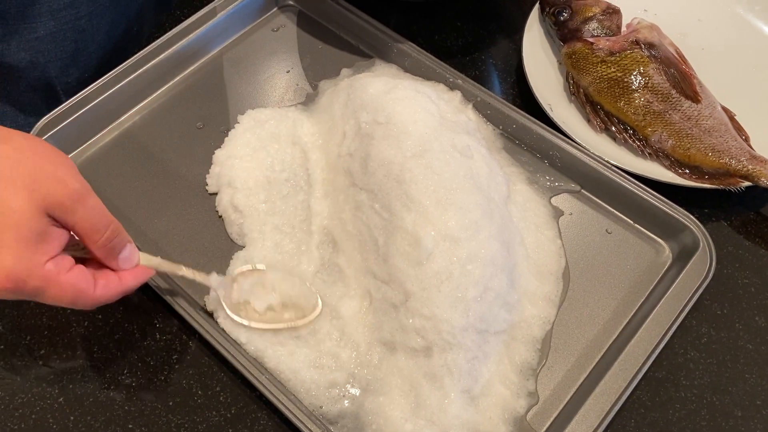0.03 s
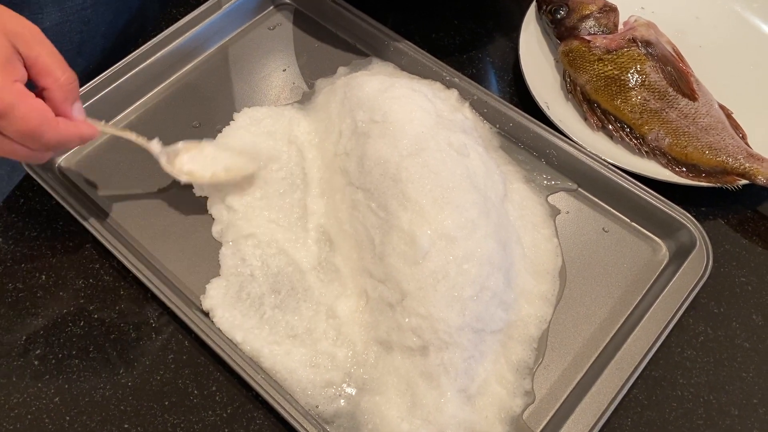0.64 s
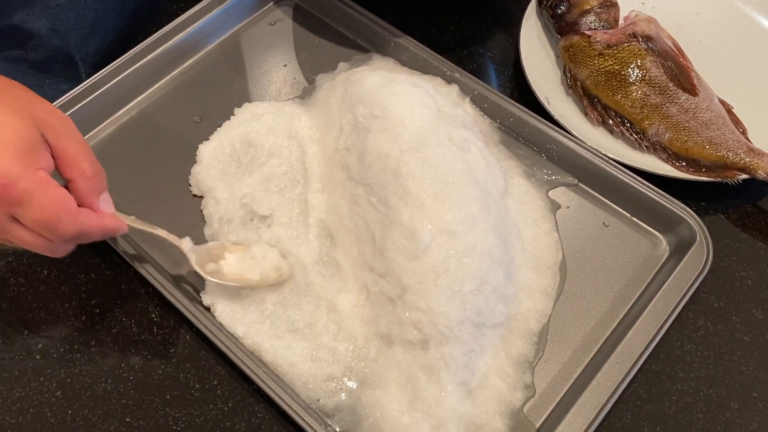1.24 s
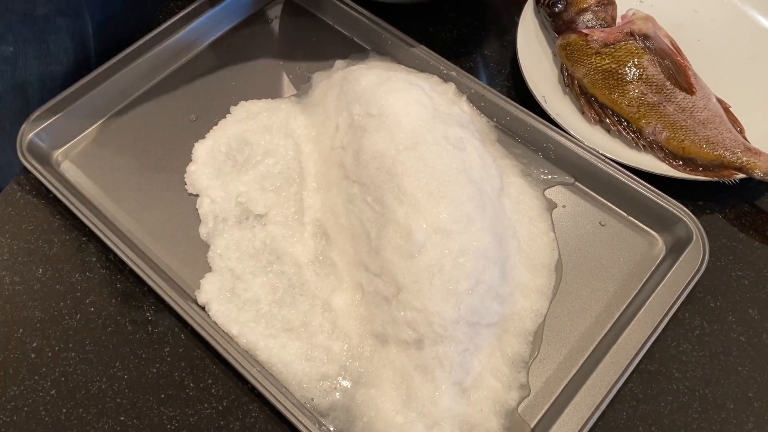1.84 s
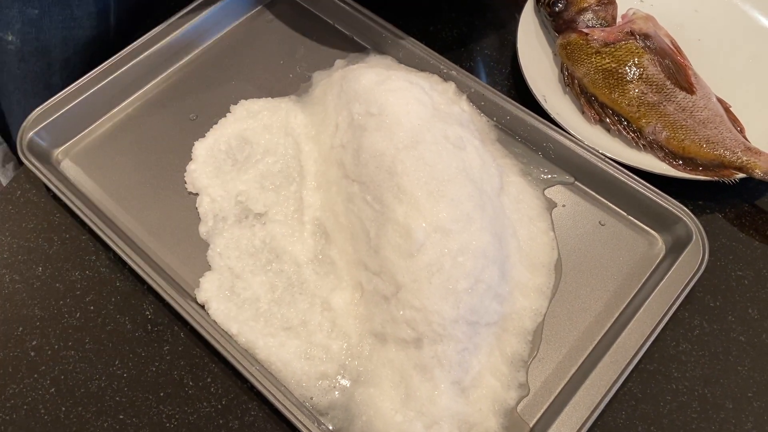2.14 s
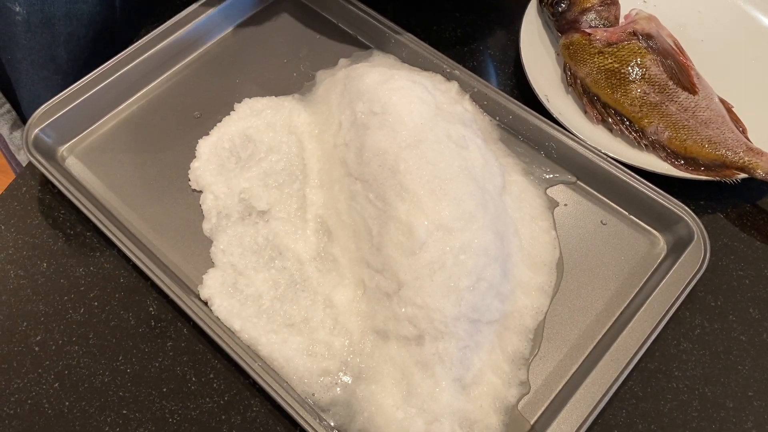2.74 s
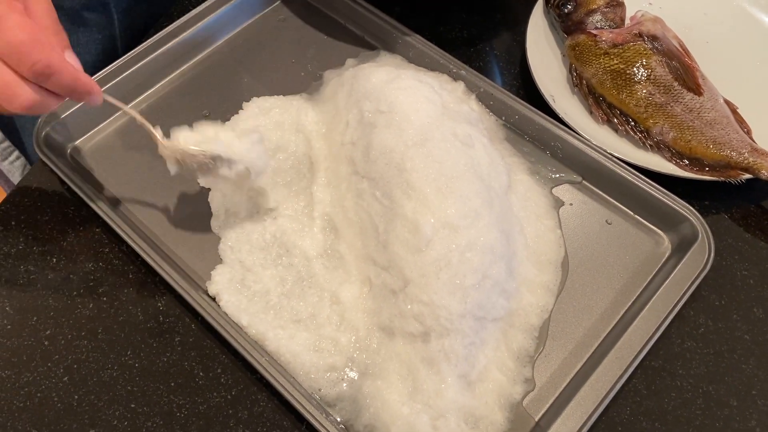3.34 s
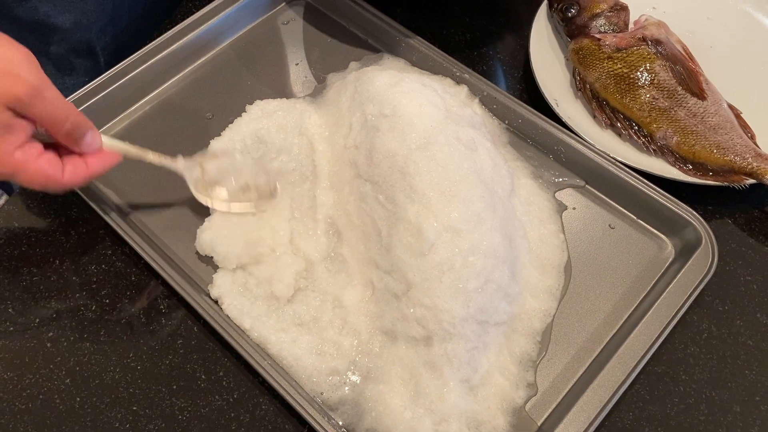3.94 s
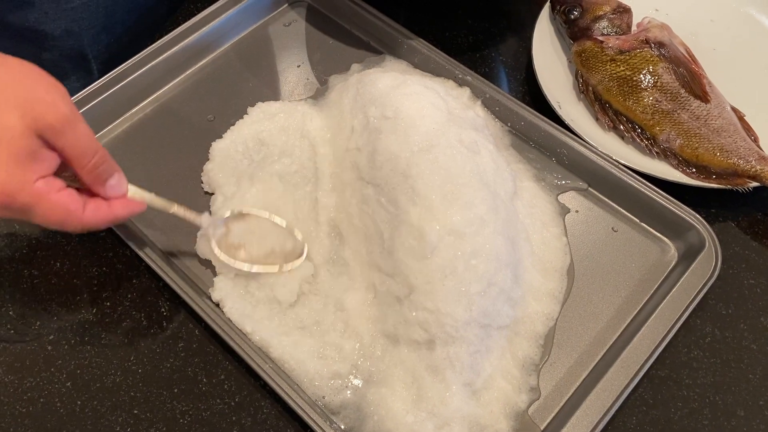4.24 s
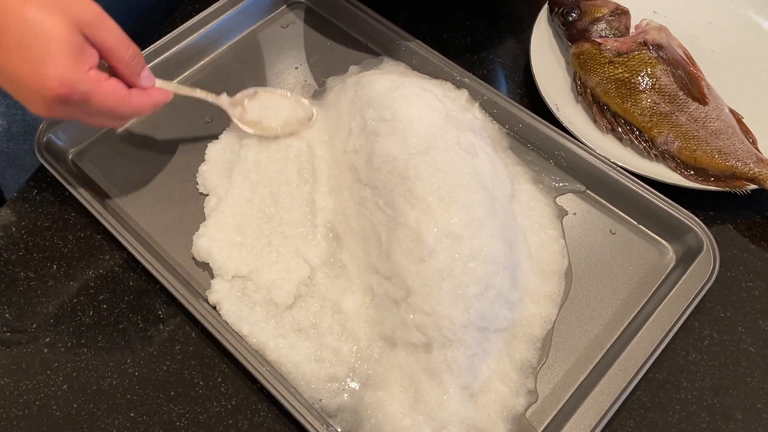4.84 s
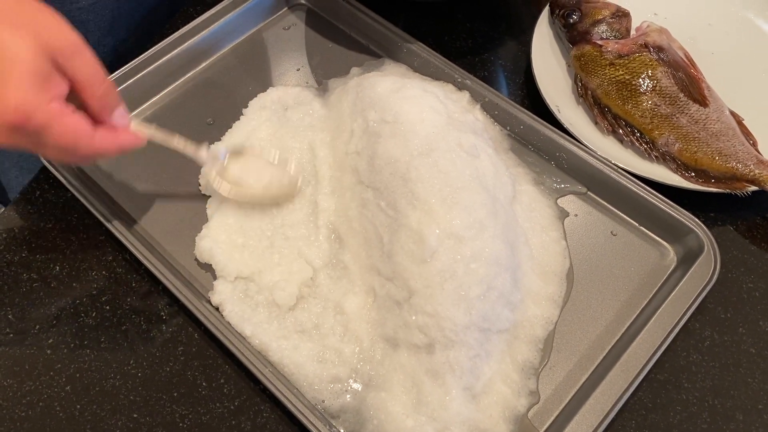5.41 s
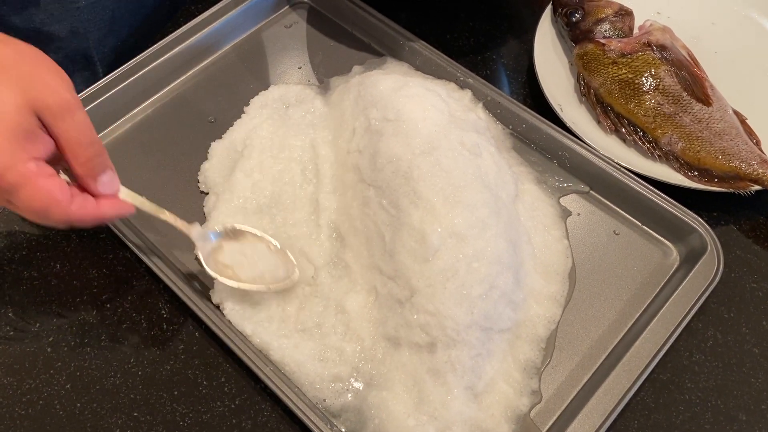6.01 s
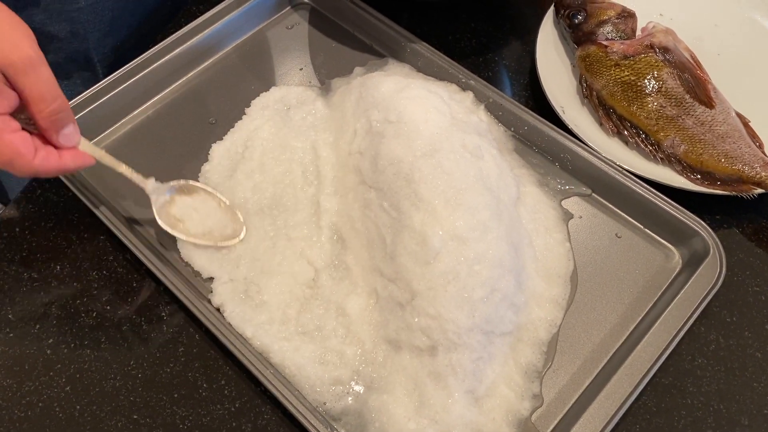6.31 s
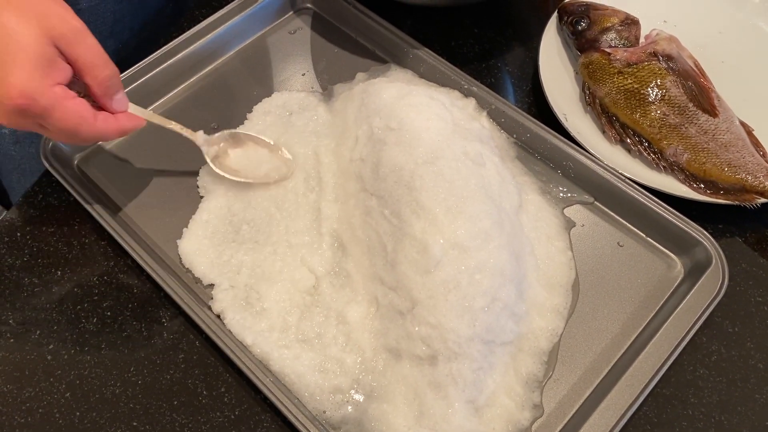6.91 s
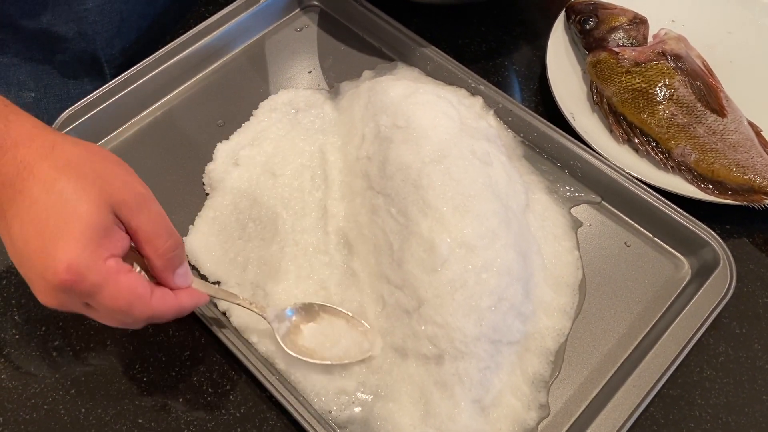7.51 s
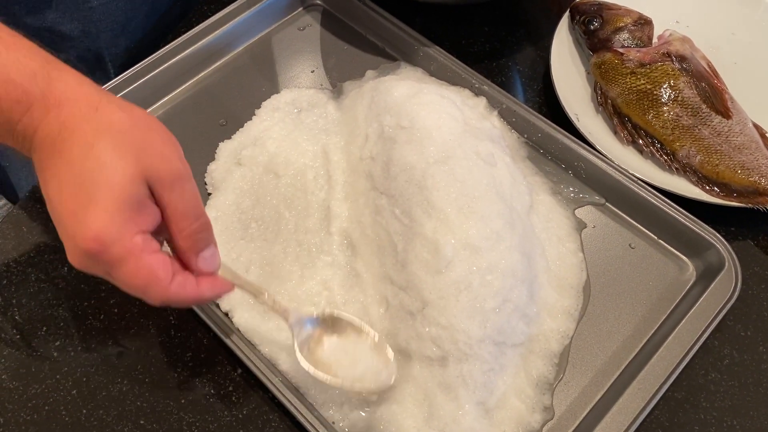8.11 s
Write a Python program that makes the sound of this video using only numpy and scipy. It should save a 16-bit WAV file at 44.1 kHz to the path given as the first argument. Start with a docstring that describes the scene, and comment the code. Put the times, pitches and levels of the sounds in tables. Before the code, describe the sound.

A metal spoon pats and spreads coarse damp salt on a baking tray, with gritty crunches, a few hollow knocks and a fan humming.

```python
"""A steel spoon pats and spreads coarse damp salt on a baking tray, close by in a small kitchen.
Each pat cracks the crust, each stroke crushes a swarm of crystals, and trapped grains rasp and squeak
on the steel. Once the spoon digs a new load from the salt box, knocking and rubbing its hollow walls.
A kitchen fan and a mains hum drone underneath."""
import sys
import numpy as np
from scipy import signal
from scipy.fft import rfft, irfft, next_fast_len
from scipy.io import wavfile
from scipy.ndimage import uniform_filter1d, map_coordinates

SR = 44100
rng = np.random.default_rng(int(sys.argv[2]) if len(sys.argv) > 2 else 0)


def transcribe(u):
    """Save the signal u as a 16-bit wav file named by the first command-line argument.

    u: samples, shape (n,) or (channels, n), limited to [-1, 1]; the rate is SR.
    q: integer samples, one column per channel.
    """
    v = np.clip(np.atleast_2d(u).T, -1, 1)
    q = np.round(v * 32767).astype(np.int16)
    wavfile.write(sys.argv[1], SR, q)


N = 359856
SETTLE_DB_PER_S = 213  # how fast the salt falls silent once the spoon lets go

# Strokes through the salt. Each row: start, length and rise in seconds, relative level in dB,
# sag over the stroke in dB (negative swells), crunch trim in dB.
STROKES = [ (0.009, 0.23, 0.04, -51, 6.5, 7.5), (0.494, 0.12, .004, -47.5, 12, 3),
           (0.734, 0.064, 0.0031, -42.5, 9, 4.5), (0.942, 0.11, 0.0043, -43.5, 15.5, 5.5),
           (1.122, 0.088, 0.018, -45.5, 10, 6.5), (1.288, 0.039, .012, -56, 2, 4.5),
           (3.352, 0.24, 0.062, -54, 4, -1.5), (3.804, 0.14, 0.003, -52.5, 1.5, -1.5),
           (4.151, 0.22, .004, -57.5, -6.5, 0), (4.393, 0.2, 0.035, -59, 3, 0.5),
           (4.802, 0.1, 0.0033, -48.5, -1, -0.5), (5.122, 0.044, 0.012, -52.5, 1.5, 4),
           (5.451, 0.1, .004, -55, 0.5, 3.5), (5.827, 0.062, 0.02, -53, -1, -0.5),
           (6.063, 0.054, 0.0066, -45, 4.5, 1), (6.16, 0.2, 0.025, -66.5, -11.5, 3),
           (6.567, 0.16, 0.0074, -51.5, 3, 3), (6.888, 0.1, 0.0089, -56.5, 5, 3.5),
           (7.173, 0.088, 0.0034, -55.5, 2, -2), (7.346, 0.16, 0.0042, -52.5, 11, 2),
           (7.955, .03, .004, -50.5, 6, 7), ]
# Small lumps falling apart. Each row: centre in seconds, level in dB, half length in seconds.
CRUMBS = [(2.593, -64, 0.026), (7.591, -63.5, 0.027), (7.792, -62.5, 0.044), (8.07, -55.5, 0.016)]
# The bright fizz and the darker crunch. Each row: frequency in Hz, relative level in dB.
FIZZ_COLOUR = [(1500, -12), (3500, -2.5), (5500, -6.5), (8200, 0), (11000, -3), (16000, -5.5)]
CRUNCH_COLOUR = [(200, -20), (450, 6.5), (2000, 2), (2800, 0), (5500, -14), (9000, -44)]
def spreading(crunch_lag_s=0.0054):
    """Sliding crystals fizz and lumps crumble; pressed crystals crunch lower as the pressure builds."""
    slide, press = np.zeros(N), np.zeros(N)
    for start, length, rise, db, sag_db, crunch_db in STROKES:
        slide += amp(db) * envelope(start, length, rise, SETTLE_DB_PER_S, sag_db)
        press += amp(db + crunch_db) * envelope(start, length, rise + crunch_lag_s, SETTLE_DB_PER_S, sag_db)
    crumble = sum(swell(*crumb) for crumb in CRUMBS)
    fizz = coloured(crystals(rate=16000, spread_db=0, clump_db=0.16), FIZZ_COLOUR)
    fizz = drifting(fizz, depth_db=2)
    crunch = coloured(crystals(rate=4000, spread_db=2.5, clump_db=1.5), CRUNCH_COLOUR)
    crunch = drifting(crunch, depth_db=3)
    return (amp(2.5) * slide + crumble) * fizz + amp(-1) * press * crunch


# The spoon lands on the salt. Each row: time in seconds, relative level in dB, packing trim in dB.
PATS = [(0.487, -27.5, 1), (0.733, -30.5, 2.5), (0.948, -26, 3), (1.838, -37, -1), (2.415, -40.5, -2),
        (2.5301, -54.5, 4), (3.461, -31, 0.5), (3.477, -43, 4), (3.5723, -40.5, -2), (4.161, -41.5, 0),
        (4.801, -46, -7), (5.459, -37.5, -1), (6.055, -34, -2), (6.58, -49, 13), (6.9102, -37, -2.5),
        (7.673, -42, 5), (7.966, -35, 1)]
# The dull crunch of the bed giving way. Each row: frequency in Hz, relative level in dB.
PACK_COLOUR = [(200, 0), (400, -7), (600, 0.5), (2200, -1.5), (4000, -5.5), (5500, -21)]
def patting(crack_t60_s=0.1, crack_rise_s=0.0038, pack_lag_s=0.014, pack_sharpness=2.1):
    """Each landing breaks the crust in a bright burst; the bed then packs down in one short crunch."""
    t = np.arange(SR // 5) / SR
    burst = amp(-60 * t / crack_t60_s) * (1 - np.exp(-t / crack_rise_s))
    squeeze = (t / pack_lag_s * np.exp(1 - t / pack_lag_s)) ** pack_sharpness
    crack, pack = np.zeros(N), np.zeros(N)
    for start, db, pack_db in PATS:
        add(crack, start - crack_rise_s / 2, amp(db) * burst)
        add(pack, start, amp(db + pack_db) * squeeze)
    crust = coloured(crystals(rate=33000, spread_db=-0.5, clump_db=1), FIZZ_COLOUR)
    bed = coloured(crystals(rate=8000, spread_db=3, clump_db=0.3), PACK_COLOUR)
    return amp(-1.5) * crack * crust + amp(-13) * pack * bed


# Resonances of spoon and tray. Each row: frequency in Hz, width in Hz, relative level in dB.
TRAY_MODES = [(554, 47, 2), (687, 100, -8), (1154, 190, 8), (1430, 130, 3.5), (1710, 51, 6.5),
              (2410, 260, -1), (2850, 80, 1), (3600, 410, -10)]
# The spoon grinds on grains, catches with a squeak, or bears down and flexes the tray.
# Each row: centre in seconds, level in dB, half length in seconds, main frequency in Hz.
GRINDS = [(0.103, -50, 0.023, 2380), (0.563, -47.5, 0.014, 2600), (0.789, -41, 0.004, 1300),
          (0.961, -43, 0.009, 3100), (1.972, -47, 0.043, 3700), (4.537, -54, 0.031, 3400),
          (4.902, -47, 0.037, 3900), (4.917, -44.5, 0.023, 1350), (6.337, -56, 0.027, 2900)]
SQUEAKS = [(4.893, -45, 0.022, 1720), (4.903, -50, 0.005, 2400), (4.919, -45, 0.009, 2860),
           (6.931, -48, 0.009, 2830), (7.981, -49, 0.007, 1740), (8.014, -41.5, 0.0032, 1670)]
PRESSES = [(0.494, -42, 0.0066, 700), (0.972, -37, .006, 630), (6.589, -45, 0.011, 695),
           (6.67, -53, 0.039, 560), (6.927, -46, 0.012, 610), (7.988, -45, 0.016, 644)]
# The force of bare grit and of a touch cushioned by salt. Each row: frequency in Hz, gain in dB.
GRITTY_FORCE = [(600, -8), (1300, 3)]
CUSHIONED_FORCE = [(800, 3), (1600, -21)]
def grinding():
    """Trapped crystals rasp broadly on steel or squeak in one resonance; presses wake the low modes."""
    grinds = rasp(GRINDS, TRAY_MODES, GRITTY_FORCE, focus=1.6)
    squeaks = rasp(SQUEAKS, TRAY_MODES, GRITTY_FORCE, focus=14)
    presses = rasp(PRESSES, TRAY_MODES, CUSHIONED_FORCE, focus=4.9)
    return grinds + squeaks + presses


# The spoon hits the box. Each row: start in seconds, relative level in dB, the blow's frequency in Hz.
KNOCKS = [(1.8588, -21.5, 630), (1.866, -16.5, 318), (1.9582, -16, 970), (1.961, -14.5, 355),
          (2.4174, -16.5, 406), (2.426, -12.5, 203), (2.439, -20.5, 190), (2.451, -23, 300),
          (2.472, -34, 477)]
# The hollow ring of the box. Each row: frequency in Hz, relative level in dB, 60 dB decay in seconds.
BOX_MODES = [(185.3, -1, 0.089), (248, -2, 0.055), (331, 5.8, 0.036), (400, 6, 0.019), (487, 1.5, 0.044),
             (619, -12, 0.13), (737, -15, 0.057), (1025, -7.5, 0.036), (1400, -8, 0.035)]
def knocking(rise_cycles=0.75, focus=3, tick_t60_s=0.0086):
    """The full box rings briefly; a softer blow builds more slowly, favours low modes and ticks less."""
    t = np.arange(SR // 4) / SR
    tick_band = signal.butter(2, [1500, 6000], "band", fs=SR)
    box = np.zeros(N)
    for start, db, blow_hz in KNOCKS:
        ring = sum(mode_share(hz, blow_hz, focus) * amp(level - 60 * t / t60) * np.sin(2 * np.pi * hz * t)
                   for hz, level, t60 in BOX_MODES)
        attack = 1 - np.exp(-(t * blow_hz / rise_cycles) ** 2)
        grit = signal.lfilter(*tick_band, rng.standard_normal(len(t)))
        tick = hardness(blow_hz) * amp(-15 - 60 * t / tick_t60_s) * grit
        add(box, start, amp(db) * (ring * attack + tick))
    return box


# Drags along the box wall.
# Each row: centre in seconds, level in dB, half length in seconds, main frequency in Hz.
RUBS = [(1.982, -38, 0.0069, 600), (2.008, -38, 0.0084, 700), (2.043, -41, 0.0031, 980),
        (2.44, -41, 0.03, 470)]
# The force of a drag. Each row: frequency in Hz, gain in dB.
DRAG_FORCE = [(480, -7), (650, -2), (1100, -8), (2000, -16)]
def rubbing():
    """Dragged along the wall, the spoon draws a hollow groan from the modes of the box."""
    # a longer ring makes a narrower, taller resonance
    modes = [(hz, np.log(1000) / (np.pi * t60), db + 20 * np.log10(t60)) for hz, db, t60 in BOX_MODES]
    return rasp(RUBS, modes, DRAG_FORCE, focus=7.6)[0]


# Loose salt pouring inside the box. Each row: frequency in Hz, relative level in dB.
SCOOP_COLOUR = [(200, 8), (600, 4.5), (1100, -1.5), (1700, 0), (3200, -7.5), (5400, -11.5), (6400, 2),
                (7600, -1), (8600, -6), (11000, -9), (16000, -7)]
def scooping(dig_s=1.838, lift_s=2.44):
    """Crystals pour around the spoon until it lifts out of the box; hard knocks shake some more."""
    since_lift = np.maximum(np.arange(N) / SR - lift_s, 0)
    pour = amp(-42.5) * envelope(dig_s, hold_s=0.28, rise_s=0.01, release_db_per_s=47)
    pour *= amp(-SETTLE_DB_PER_S * since_lift)
    shaken = np.zeros(N)
    for start, db, blow_hz in KNOCKS:
        jolt = envelope(start, hold_s=0.0024, rise_s=0.001, release_db_per_s=380)
        shaken += hardness(blow_hz) * amp(db - 26) * jolt
    grains = coloured(crystals(rate=7000, spread_db=2.5, clump_db=1), SCOOP_COLOUR)
    return np.hypot(pour, shaken) * drifting(grains, depth_db=2.5)


def box_click():
    """The spoon strikes the box with one hard, bright click."""
    band = signal.butter(2, [3200, 11000], "band", fs=SR)
    hiss = unit(signal.lfilter(*band, rng.standard_normal((2, N))))
    return swell(centre_s=1.8595, db=-32, half_s=0.0042) * hiss


# The low rush of the fan. Each row: frequency in Hz, relative level in dB.
AIR_COLOUR = [(20, -43), (32, -14), (45, -5), (60, -4), (129, -6.5), (380, -17.5), (895, -27.5),
              (1250, -28), (2500, -37), (6200, -54.5), (15500, -60)]
# The drone of motor and mains. Each row: frequency in Hz, level in dB.
HUM_TONES = [(48.3, -49), (69, -50), (97.5, -52), (120, -50.5), (238, -61.5), (275, -59), (357, -62.5),
             (397.5, -60.5)]
def fan():
    """Rushing air with slightly unsteady motor and mains tones."""
    t = np.arange(N) / SR
    drone = amp(-44.5) * coloured(rng.standard_normal((2, N)), AIR_COLOUR)
    quarter_cycle = np.array([[0], [np.pi / 2]])  # offsets the two rows, so the tones sound wide
    for hz, db in HUM_TONES:
        gain = np.sqrt(2) * amp(db + 1.3 * wobble(5))
        phase = quarter_cycle + 0.68 * np.array([wobble(5), wobble(3.02)])
        drone += gain * np.sin(2 * np.pi * hz * t + phase)
    return drone


# The short tail of the room. Each row: frequency in Hz, 60 dB decay in seconds.
ROOM_DECAY = [(150, 0.19), (1000, 0.35), (5000, 0.35), (15000, 0.13)]
def kitchen(x):
    """Hard walls answer in two unrelated tails; the highest treble dies first."""
    hz, t, noise = signal.stft(rng.standard_normal((2, SR // 2)), SR, nperseg=256)
    decay = amp(-60 * t / along(ROOM_DECAY, hz)[:, None])
    tail = signal.istft(noise * decay, SR, nperseg=256)[1]
    tail = np.pad(tail, ((0, 0), (SR // 250, 0)))  # 4 ms pre-delay
    return signal.fftconvolve(x[None], tail / np.linalg.norm(tail[0]), axes=1)[:, :N]


# Stereo width below the high treble. Each row: frequency in Hz, left-right likeness (1 is mono).
LIKENESS = [(60, 0.75), (300, 0.81), (600, 0.14), (1200, 0.06), (3500, 0.53), (5400, 0.32), (6400, 0.53)]
def stereo(pair, shared=0.34, treble_hz=6400, in_phase_hz=7020, period_hz=4130):
    """Two unrelated rows become left and right; up the treble they turn in and out of phase."""
    cycle = lambda hz: 2 * np.pi * (hz - in_phase_hz) / period_hz
    treble_likeness = lambda hz: np.sin(np.pi / 2 * np.cos(cycle(hz)))
    likeness = lambda hz: np.where(hz < treble_hz, along(LIKENESS, hz), treble_likeness(hz))
    angle = lambda hz: np.arccos(np.clip(likeness(hz), -1, 1)) / 2
    # in the treble some of the first row feeds the side, a quarter cycle off
    bleed = lambda hz: shared * (hz > treble_hz) * np.sign(np.sin(cycle(hz)))
    side_mix = lambda hz: np.array([-1j * bleed(hz), np.sqrt(1 - bleed(hz) ** 2)])
    mid = filtered(pair[0], lambda hz: np.cos(angle(hz)))
    side = filtered(pair, lambda hz: np.sin(angle(hz)) * side_mix(hz)).sum(0)
    return np.array([mid + side, mid - side])


def crystals(rate, spread_db, clump_db):
    """Tiny fractures, rate a second, uneven and in clumps; two rows for two directions of radiation."""
    breaks = np.sqrt(rng.poisson(rate / SR, N))
    size = amp(spread_db * rng.standard_normal(N) + clump_db * wobble(170))
    return unit(breaks * size * rng.standard_normal((2, N)))


def rasp(contacts, modes, force, focus):
    """Bursts of tiny slips excite resonances; the place of contact favours some of them."""
    out = np.zeros((2, N))
    grit = crystals(rate=6000, spread_db=-0.5, clump_db=1)
    n = np.arange(SR // 3)
    f = np.fft.rfftfreq(len(n), 1 / SR)
    resonance = lambda hz, width: 1j * f * width / (hz * hz - f * f + 1j * f * width)
    for centre, db, half, main_hz in contacts:
        start = max(centre - 3 * half, 0)
        bell = np.exp(-((start + n / SR - centre) / half) ** 2)
        body = sum(amp(level) * mode_share(hz, main_hz, focus) * resonance(hz, width)
                   for hz, width, level in modes)
        slips = bell * grit[:, (round(start * SR) + n) % N]
        ring = irfft(rfft(slips) * body * amp(along(force, f)), len(n))
        add(out, start, amp(db) * np.sqrt(np.mean(bell ** 2)) * unit(ring))
    return out


def drifting(x, depth_db):
    """The colour drifts in patches as the contact moves."""
    spectrum = signal.stft(x, nperseg=512)[2]
    patches = uniform_filter1d(rng.standard_normal(spectrum.shape[1:]), size=6, axis=0)
    patches = unit(uniform_filter1d(patches, size=9, axis=1))
    return unit(signal.istft(spectrum * amp(depth_db * patches), nperseg=512)[1][:, :N])


def mode_share(hz, main_hz, focus):
    """A contact drives modes near its main frequency most; more focus narrows the range."""
    return 1 / np.hypot(1, focus * (hz / main_hz - main_hz / hz))


def hardness(blow_hz, hard_hz=620):
    """Near 0 for a soft, low blow, 1 for a sharp one."""
    return min(blow_hz / hard_hz, 1) ** 2


def envelope(start_s, hold_s, rise_s, release_db_per_s, sag_db=0):
    """Gain that rises, sags evenly while it is held, then dies away."""
    t = np.maximum(np.arange(N) / SR - start_s, 0)
    fall_db = sag_db * np.minimum(t / hold_s, 1) + release_db_per_s * np.maximum(t - hold_s, 0)
    return (1 - np.exp(-t / rise_s)) * amp(-np.minimum(fall_db, 200))


def swell(centre_s, db, half_s):
    """A bell-shaped gain around a time."""
    return amp(db) * np.exp(-np.minimum(((np.arange(N) / SR - centre_s) / half_s) ** 2, 50))


def wobble(rate):
    """A smooth random curve, rate knots a second."""
    return map_coordinates(rng.standard_normal(int(N * rate / SR) + 4), [np.arange(N) * rate / SR])


def coloured(x, colour):
    """x shaped by a (Hz, dB) curve, at rms 1."""
    return unit(filtered(x, lambda hz: amp(along(colour, hz))))


def filtered(x, response):
    """x through a complex frequency response."""
    size = next_fast_len(N + SR // 2)
    return irfft(rfft(x, size) * response(np.fft.rfftfreq(size, 1 / SR)), size)[..., :N]


def along(points, hz):
    """(Hz, value) points read on a log axis."""
    freqs, values = np.transpose(points)
    return np.interp(np.log(hz + 1), np.log(freqs + 1), values)


def add(track, start_s, sound):
    """Mix a sound into a track at a time."""
    part = track[..., round(start_s * SR):][..., :sound.shape[-1]]
    part += sound[..., :part.shape[-1]]


def amp(db):
    """Decibels to gain."""
    return 10 ** (np.asarray(db) / 20)


def unit(x):
    """Scale to rms 1."""
    return x / np.sqrt(np.mean(x ** 2) + 1e-20)


# The tray lies to the left. Each row: frequency in Hz, left over right in dB.
TRAY_PAN = [(500, 2), (1400, 1), (2800, 5.5), (4500, 3.5), (6500, -0.5)]
def scene():
    """Salt to the left, the box in the centre and the fan spread wide, in one room."""
    salt = spreading() + grinding() + scooping() + box_click() + patting()
    box = knocking() + rubbing()
    salt = stereo(salt + amp(-10.5) * kitchen(salt[0]))
    salt = filtered(salt, lambda hz: amp(np.outer([0.5, -0.5], along(TRAY_PAN, hz))))
    box_reverb = amp(-8.5) * stereo(kitchen(box))
    drone = stereo(fan()) * amp([[-0.5], [0.5]])
    return salt + box + box_reverb + drone


def record(dry, top_hz=15800):
    """A steep low-pass cuts off the highest treble."""
    return filtered(dry, lambda hz: 1 / np.hypot(1, (hz / top_hz) ** 200))


dry = scene()
out = record(dry)
transcribe(out)
```